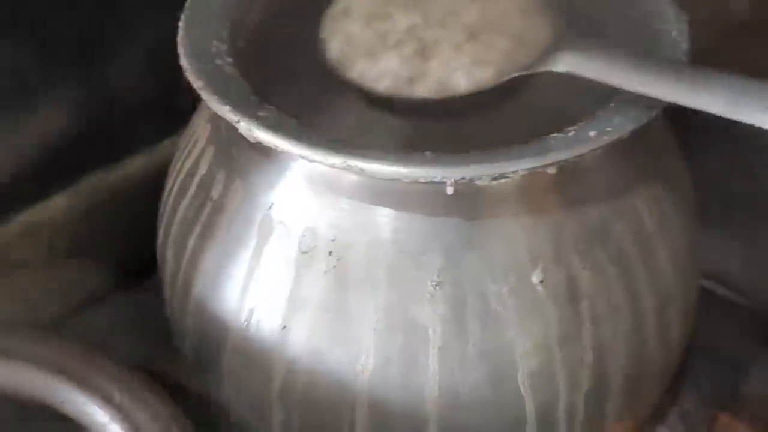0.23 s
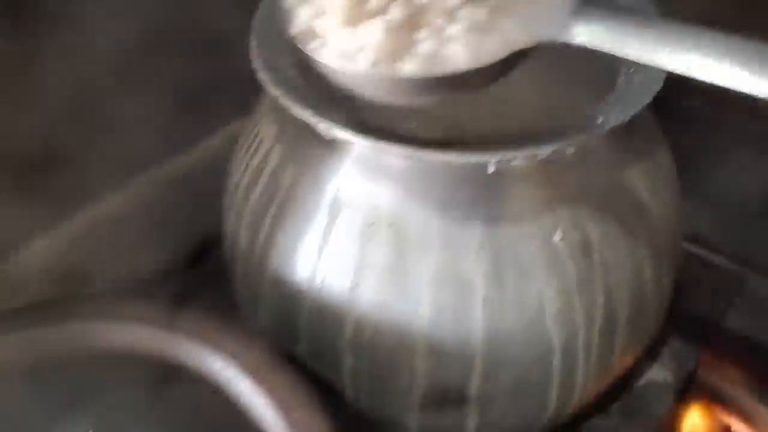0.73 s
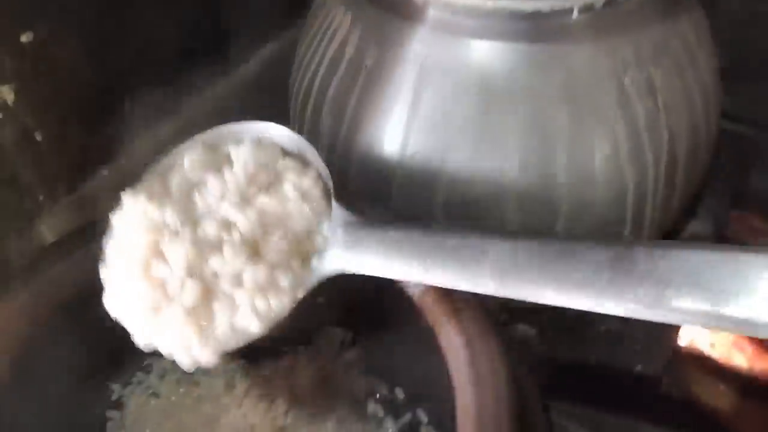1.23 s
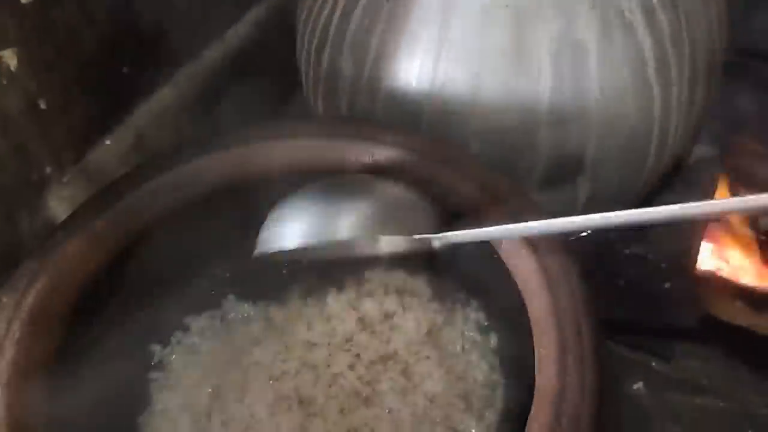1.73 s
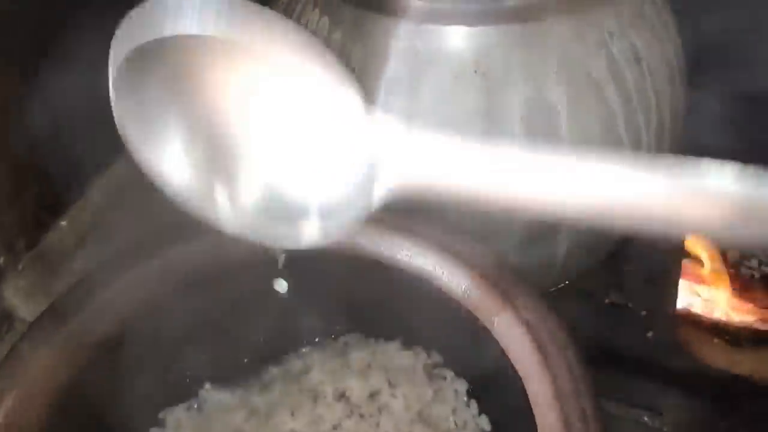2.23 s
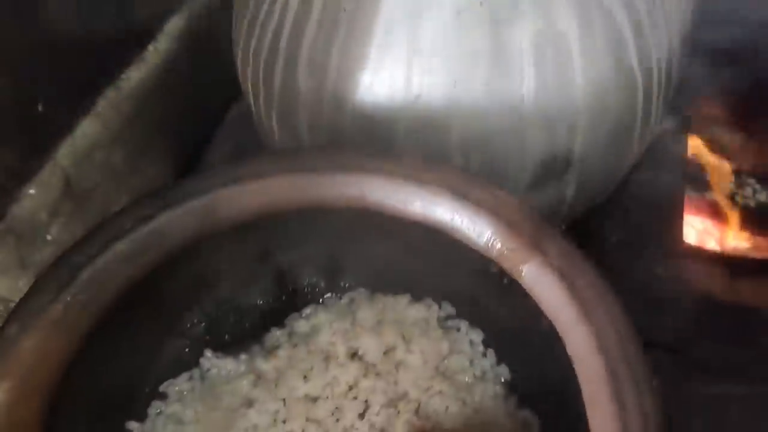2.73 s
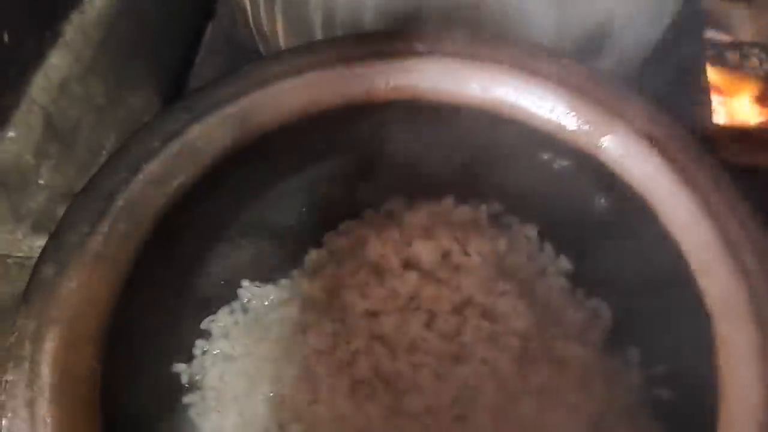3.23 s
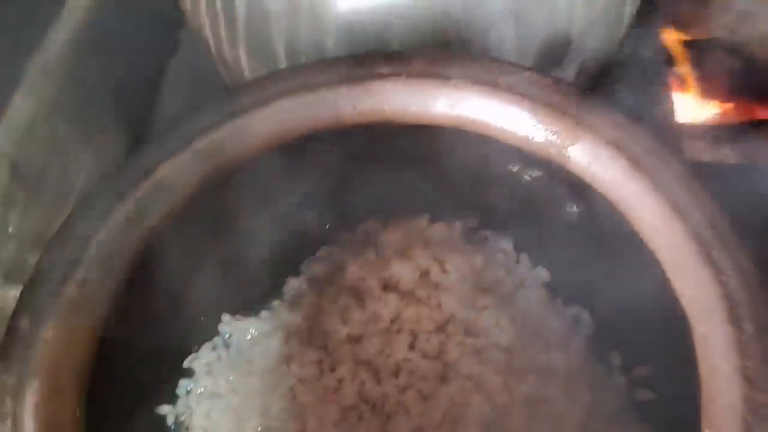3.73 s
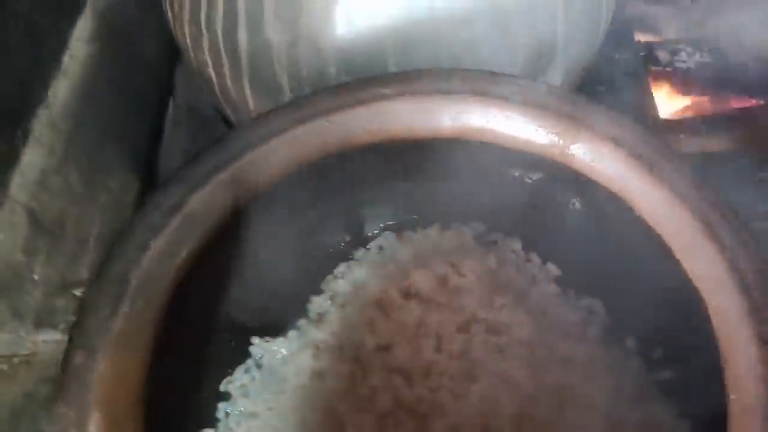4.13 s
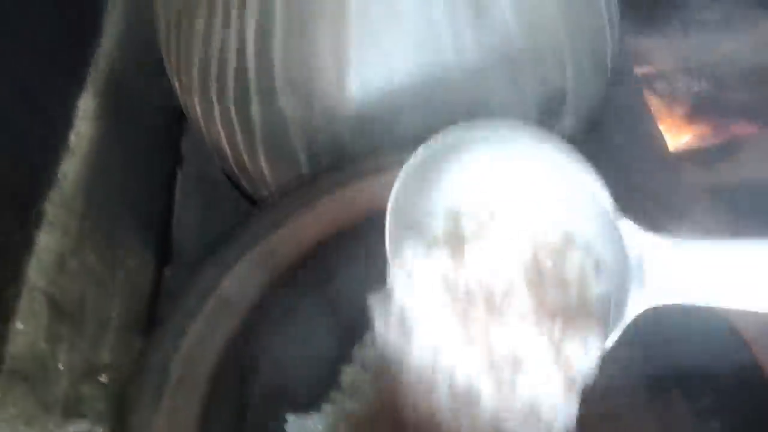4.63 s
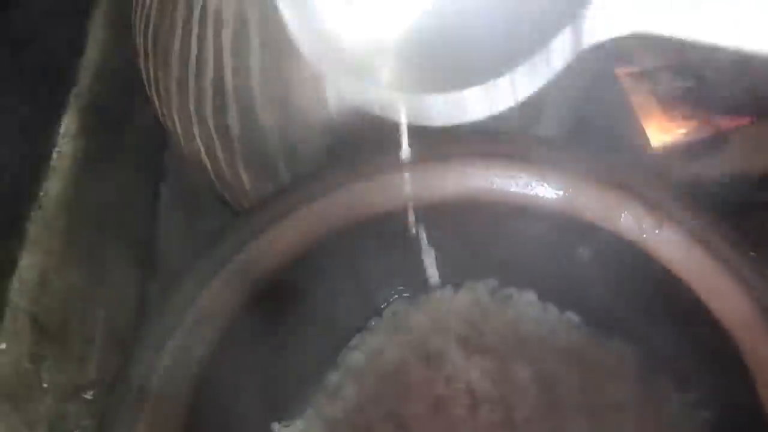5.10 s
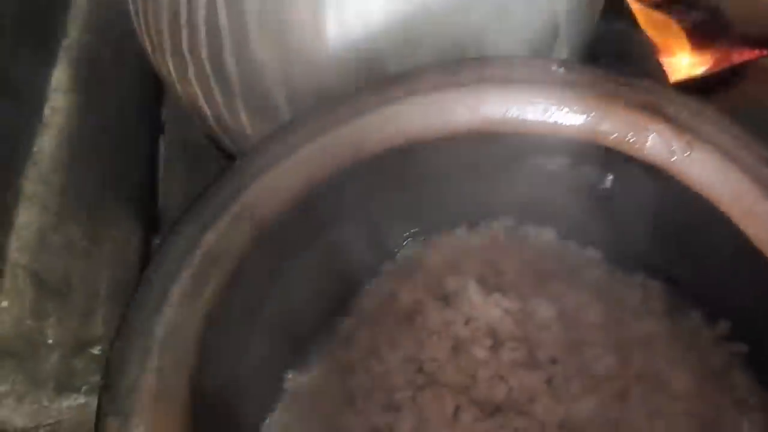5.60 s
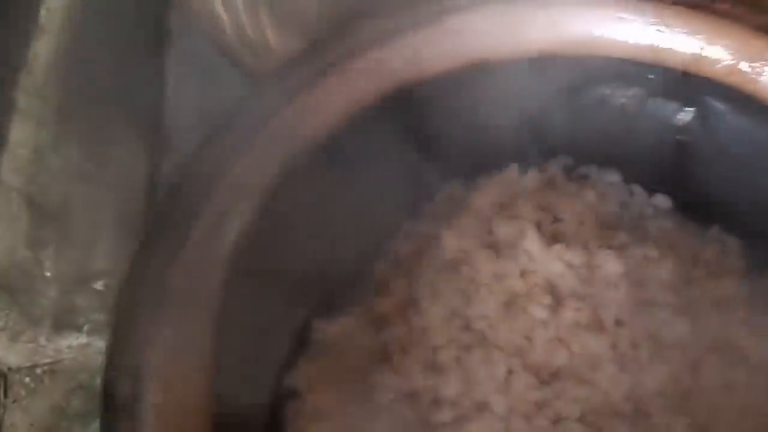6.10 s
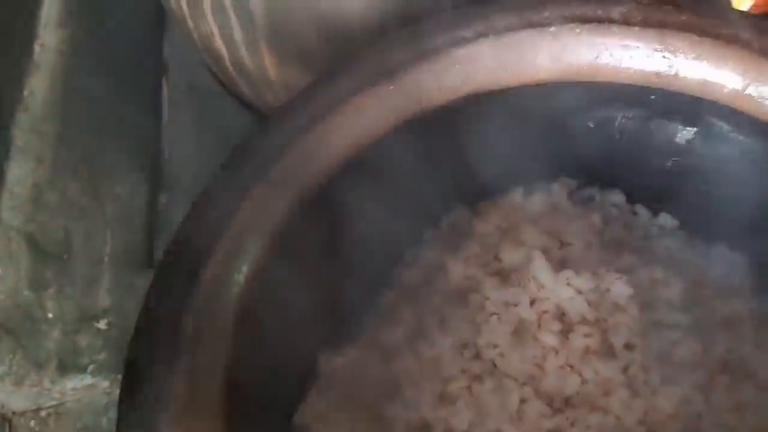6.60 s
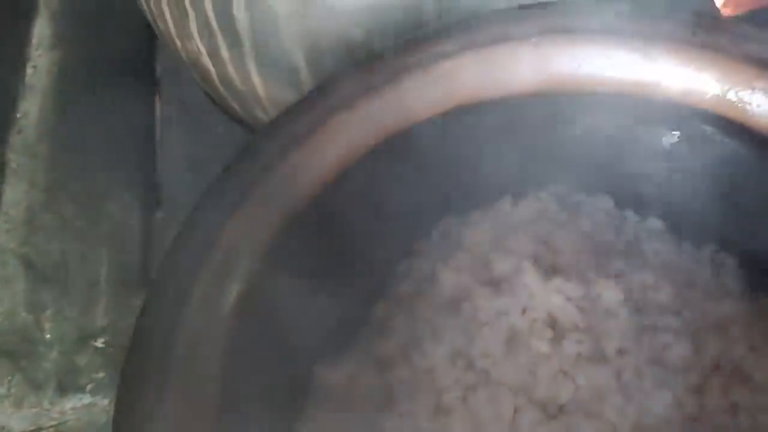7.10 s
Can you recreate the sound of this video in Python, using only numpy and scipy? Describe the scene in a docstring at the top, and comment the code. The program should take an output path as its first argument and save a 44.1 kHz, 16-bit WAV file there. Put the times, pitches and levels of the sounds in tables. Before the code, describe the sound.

A steel ladle tips soggy rice into a clay pot, close to the microphone in a small room. Wet patter and snaps lead to a sharp clack on the rim, then soft pot bubbling and gritty little scrapes. Another splashy dollop lands, with deep glugs and a thin sizzle. Late on come a dull ringing bump and rasping clinks, then quiet bubbling; a hoarse call is barely heard far outside.

```python
"""Boiled rice is ladled from an aluminium pot into a clay pot on a wood stove, close by in a small kitchen.
Wet rice slides and patters as random grains of noise and tiny ringing bubbles; water bubbles as damped tones
in the hollow of the pot. The steel ladle knocks on the clay rim, then bumps and scrapes in the metal pot:
damped modes set off by bursts of noise and by random slips. Spilt water sizzles faintly as filtered grains,
and a hoarse call far outside is narrow-band noise."""
import sys
import numpy as np
from scipy import signal
from scipy.fft import rfft, irfft, next_fast_len
from scipy.io import wavfile
from scipy.ndimage import map_coordinates

SR = 44100
rng = np.random.default_rng(int(sys.argv[2]) if len(sys.argv) > 2 else 0)


def waveform_to_disk(signal):
    """Save audio, clipped to [-1, 1], as 16-bit WAV at the path in sys.argv[1]."""
    frames = np.transpose(np.atleast_2d(signal))
    scaled = np.clip(frames, -1, 1) * 32767
    samples = np.round(scaled).astype(np.int16)
    wavfile.write(sys.argv[1], SR, samples)


N = 324135

# Levels in the tables are relative within a layer; each layer's function adds its own gain.
# wet rice slides and drips: start_s, rise_s, fade_s, crackle_db, lumps_db
RICE_SLIDES = [(0.0, 0.0008, 0.078, -64, -57), (0.208, 0.015, 0.82, -67.5, -79),
               (0.908, 0.15, 0.34, -62.5, -64.5), (1.16, 0.36, 0.13, -53, -53),
               (2.354, 0.025, 0.23, -71.5, -70), (2.579, 0.069, 0.25, -71.5, -82),
               (2.737, 0.029, 0.64, -93, -68), (2.9, 0.18, 0.19, -78, -64.5),
               (3.66, 0.17, 0.46, -55.5, -53.5), (4.252, 0.012, 0.58, -59.5, -75),
               (4.398, 0.043, 0.53, -53.5, -55), (4.519, 0.017, 0.48, -61, -66),
               (5.718, 0.024, 0.6, -94, -60), (5.843, 0.013, 0.18, -60, -59), (6.6, 0.21, 0.24, -58, -59),
               (7.012, 0.0099, 0.099, -66.5, -100)]
# spectrum of the snapping water films: frequency_hz, density_db_per_hz
CRACKLE_SPECTRUM = [(2350, -41.5), (4000, -3.5), (5020, -5), (5440, -2), (5870, -6), (7530, 4),
                    (10400, -10), (13000, -5.5), (14900, -16), (16000, -22.5)]
# spectrum of the heavier lumps: frequency_hz, density_db_per_hz
LUMP_SPECTRUM = [(350, -23), (600, 4), (845, -8.5), (1020, 0.5), (1130, -7), (1330, -16.5), (1540, -21.5),
                 (2020, -7.5), (5500, -13), (7150, -14.5), (12100, -120)]
# a slide gathers from this far under its peak, and thins out by this much over its fade
GATHER_DB, THIN_DB = 13, 32
SOFT_START_S = 0.011  # longest fade-in from silence
# air pockets pop in the wet rice, level against its lumps; cycles count to a 60 dB decay
POPS_PER_S, POP_DB, POP_HZ, POP_SCATTER, POP_CYCLES = 240, -10, 2123, 0.4, 19
# tiny bubbles ping in the water film, level against the crackle
PINGS_PER_S, PING_DB, PING_HZ, PING_SCATTER, PING_CYCLES = 420, -4, 8310, 0.14, 76
# wet smacks of rice and water: start_s, level_db, dull_db, spray_db, left_minus_right_db
WET_SMACKS = [(0.379, -41, -1, 5.5, 11), (0.486, -41.5, 0, -2.5, 8), (0.645, -48, -25, -1, 6),
              (0.932, -43, 0, -2, -4.5), (1.0517, -29, -12, -6.5, -1.5), (1.093, -36.5, -14, -2.5, 1),
              (1.272, -30, -6, -5.5, -2), (1.3697, -31.5, -6, -5.5, -2.5), (1.4203, -32, -2.5, 4, -5.5),
              (1.4604, -23.5, 3.5, -14.5, -1.5), (2.3815, -42, -18, -1.5, 7), (3.7595, -31, -10, -19, 0),
              (3.99, -32, -4, 1, -2), (4.261, -34, -11, -7, 2), (4.2864, -35.5, -4, -2, 3),
              (4.41, -30, -1.5, 2, 0), (4.443, -34, -5, 2, 0), (4.4658, -26, -8, 5.5, -0.5),
              (4.5012, -31.5, 8, 9, -1.5), (4.5356, -33.5, 1, -20, 6), (4.5679, -33, 6, -4.5, -4),
              (4.606, -31, 11, -1.5, -0.5), (4.6359, -32.5, 7, -4, -4), (5.857, -43.5, -6, 10, 5),
              (7.029, -41.5, -34, -24, -13)]
SMACK_T60_S, SMACK_ATTACK_S = 0.012, 0.002  # the film snaps and is gone

# how hard the water simmers: time_s, level_db
SIMMER_LEVEL = [(0, -63.5), (0.649, -71), (1.05, -65), (1.55, -67), (1.87, -67), (2.05, -67), (2.5, -67.5),
                (2.899, -59.5), (3.6, -59.5), (4.13, -64), (4.8, -60), (5.2, -58.5), (5.38, -61),
                (6.0, -58.5), (6.749, -53.5), (7.05, -66.5), (7.35, -55)]
# big bubbles that sound the pot's hollow: start_s, level_db, pitch_hz
BIG_BUBBLES = [(1.041, -45, 436), (1.461, -40, 458), (2.04, -54, 440), (2.363, -41.5, 453),
               (2.385, -47.5, 448), (2.711, -46, 446), (2.876, -43.5, 453), (3.266, -39.5, 439),
               (3.485, -33.5, 436), (3.761, -32, 405), (4.185, -47, 428), (4.227, -42, 450),
               (4.29, -42.5, 450), (4.472, -27, 436), (4.931, -34.5, 468), (5.076, -26.5, 453),
               (5.252, -37.5, 462), (5.58, -35.5, 404), (5.704, -27, 419), (5.847, -30.5, 420),
               (6.618, -40, 430), (6.779, -34.5, 382), (7.028, -42.5, 420), (7.226, -42, 420),
               (7.311, -37, 385)]
# resonance of the pot's hollow: frequency_hz, density_db_per_hz
HOLLOW_SPECTRUM = [(50, -43.5), (110, -27), (170, -18), (270, -11.5), (330, -9), (395, 0), (450, 7),
                   (540, -16), (700, -30.5), (820, -12.5), (940, -44), (1090, -14), (1300, -42),
                   (2200, -57)]
# small bubbles come at random, their level following the simmer
BLIPS_PER_S, BLIP_DB, BLIP_SCATTER_DB, BLIP_HZ, BLIP_SCATTER = 7, 6.5, 6, 444, 0.047
# drops that fall into water; the first row, at 0.107 s, is instead the low tone of the ladle's light tap on the
# pot: start_s, level_db, pitch_hz, spatter_db
WATER_DROPS = [(0.107, -47.5, 1100, -7), (1.986, -51, 1100, -32), (2.166, -55, 1110, -26),
               (2.771, -40, 1033, -7.5), (3.692, -42, 970, -7), (3.724, -41, 904, -6),
               (3.759, -34, 996, -2), (3.793, -38.5, 1073, -18), (4.42, -49, 1970, 1.5),
               (4.471, -52, 1150, -8), (4.508, -47, 1150, 0), (4.556, -43, 2030, -18),
               (4.878, -40, 1077, -11.5), (5.733, -37, 1088, -1), (5.765, -41, 1032, 2),
               (6.692, -46.5, 1050, 4), (6.784, -42.5, 1040, -19)]
# water runs off the ladle into the clay pot: start_s, rise_s, fade_s, level_db
LADLE_TRICKLES = [(1.04, 0.01, 0.25, -60.5), (1.2, 0.27, 0.35, -61)]
PLOPS_PER_S, PLOP_HZ, PLOP_SCATTER, PLOP_CYCLES = 90, 700, 0.38, 54

# the ladle strikes the clay pot's rim: start_s, level_db
RIM_KNOCKS = [(1.628, -41.5), (1.6288, -14.5)]
# modes of the ladle against a rim: frequency_hz, level_db, t60_s
RIM_MODES = [(126, -29.5, 0.097), (244.6, -17.5, 0.099), (341, -18, 0.15), (449, -11, 0.17),
             (505, -13.5, 0.1), (697, -23.5, 0.16), (937, -11, 0.04), (1076, -5.5, 0.04),
             (1236, -30.5, 0.31), (1430, -1.5, 0.017), (1747, 0.5, 0.015), (1955, 3, 0.016),
             (2190, -3.5, 0.02), (2120, -31.5, 0.25), (3940, -34, 0.3), (13200, -22, 0.13),
             (14300, -36, 0.1)]
# spectrum of the dry clack: frequency_hz, density_db_per_hz
CRACK_SPECTRUM = [(30, -36.5), (60, -26), (95, -12), (150, -10), (240, -7), (470, 0.5), (720, -8), (950, 3),
                  (1450, -1.5), (2000, -9), (2400, -13.5), (3000, -18), (3600, -21.5), (4300, -18.5),
                  (5300, -29.5), (8000, -21), (11000, -37.5), (13200, -32), (16000, -38)]
ECHO_S, ECHO_DB = 0.03, -16.5  # a kitchen wall throws back the middle of the ladle's ring

# the ladle meets the metal pot:
# start_s, click_db, wall_db, hollow_db, hollow_rise_s, hollow_pitch_hz, hollow_t60_s
POT_BUMPS = [(0.048, -61, -66, -56, 0.004, 490, 0.037), (0.226, -82, -48.5, -48, 0.0036, 480, 0.061),
             (0.267, -61, -47.5, -52, 0.0026, 460, 0.069), (1.936, -70, -51.5, -82, 0.003, 430, 0.08),
             (3.124, -33, -45, -54, 0.0037, 460, 0.1), (3.315, -44.5, -50, -52, 0.002, 440, 0.1),
             (6.098, -31, -22.5, -20, 0.01, 439.4, 0.089), (6.151, -41.5, -30, -30.5, 0.062, 459, 0.12),
             (6.2464, -27.5, -33.5, -37, 0.0082, 455, 0.2)]
# modes of the metal pot with its load: frequency_hz, level_db, t60_s
WALL_MODES = [(97, -32, 0.095), (191, -6, 0.22), (216, -5, 0.12), (269.8, 2.5, 0.12), (319, -2.5, 0.041),
              (386.7, 0.5, 0.09), (476, -1, 0.098), (635, -9, 0.069), (682, -7, 0.042),
              (739.6, -3.5, 0.062), (1360, -11.5, 0.036)]
WALL_BUILD_CYCLES, THUD_DB = 3.1, -12.5  # low modes are the slowest to swell; dull thud of the load
# strokes of the ladle in the metal pot: start_s, length_s, end_grit_db, grit_growth_db, wall_db
LADLE_STROKES = [(3.113, 0.12, -58.5, 3, -60), (3.299, 0.072, -56, 9, -53.5),
                 (3.416, 0.057, -51.5, 1, -54.5), (3.517, 0.037, -47, -8, -67),
                 (3.585, 0.018, -48.5, 0, -53), (6.228, 0.155, -43.5, 10, -40),
                 (6.419, 0.022, -44.5, -3, -43.5), (6.529, 0.031, -52.5, -6.5, -61)]
STROKE_ATTACK_S, STROKE_RELEASE_S = 0.037, 0.27  # the edge bites; it lets go (60 dB)
# spectrum of gritty contact: frequency_hz, density_db_per_hz
GRIT_SPECTRUM = [(60, -81), (300, -20), (800, -8.5), (1100, -2.5), (1350, -7), (1900, 0), (2400, 0),
                 (3050, -7), (3600, -5), (5000, -5.5), (8100, -5), (10400, -15.5), (14000, -19.5),
                 (16000, -31)]
# modes of the ladle's bowl, rung by every slip of its edge: frequency_hz, level_db, t60_s
BOWL_MODES = [(736, 11, 0.059), (1337, 5, 0.09), (1840, 11, 0.013), (2340, 7, 0.044), (3500, -10.5, 0.073),
              (3900, 13, 0.049), (8340, 7, 0.016)]
BOWL_DB = -7  # over the dry rasp
# the ladle's edge catches and sings: start_s, length_s, pitch_hz, level_db
EDGE_CHATTER = [(3.306, 0.14, 4060, -59.5), (3.443, 0.097, 2380, -53), (6.328, 0.059, 2450, -48),
                (6.533, 0.049, 1680, -54)]
CHATTER_WANDER = 0.038  # share by which the pitch shifts as the contact point moves
# the edge taps the pot or snags on a crust: start_s, ring_db, pitch_hz, t60_s, crunch_db, wall_db
EDGE_CLINKS = [(0.107, -54.5, 2062, 0.15, -53.5, -52), (2.383, -54.5, 970, 0.023, -67, -51.5),
               (2.833, -58, 1700, 0.018, -67, -80), (2.932, -51, 1770, 0.019, -72, -80),
               (3.0285, -49, 2940, 0.014, -42.5, -70), (3.126, -38.5, 743, 0.088, -48, -48),
               (3.138, -51, 1370, 0.042, -47, -42.5), (3.229, -49, 2410, 0.052, -52, -54),
               (3.443, -49, 2150, 0.063, -43, -41), (3.46, -40.5, 2295, 0.076, -52.5, -58),
               (3.482, -40, 764, 0.054, -67, -46), (3.541, -48, 2390, 0.04, -37, -50),
               (3.627, -42.5, 1220, 0.024, -32, -61), (3.652, -57, 2130, 0.03, -35, -45),
               (6.262, -40, 2490, 0.044, -40, -29), (6.303, -47.5, 1435, 0.035, -34, -30),
               (6.33, -37.5, 2470, 0.055, -43, -32), (6.346, -31.5, 746, 0.094, -39, -26.5),
               (6.366, -44, 1326, 0.08, -40, -28), (6.385, -50, 2060, 0.038, -46, -27.5),
               (6.422, -44, 1346, 0.069, -40, -35), (6.468, -47, 1730, 0.074, -27.5, -44),
               (6.534, -47, 1690, 0.05, -52, -54), (6.561, -56, 1710, 0.044, -44, -54),
               (6.59, -58, 1490, 0.037, -39, -70)]

# soft shuffling of the hand and handle: start_s, rise_s, fade_s, level_db
HANDLE_SHUFFLE = [(0.0, 0.043, 0.44, -56.5), (0.211, 0.013, 0.83, -58), (5.0, 0.115, 0.4, -61.5),
                  (5.62, 0.11, 0.35, -60), (7.22, 0.028, 0.077, -83)]
# spectrum of dull rubs and thuds: frequency_hz, density_db_per_hz
DULL_SPECTRUM = [(40, -28), (95, -1.5), (190, 6), (270, 2), (340, -7.5), (560, 4), (800, -4), (1200, -12),
                 (1600, -45.5), (2200, -21), (5000, -34)]
# spilt water sizzles on the hot stove and boils away
SPILL_S, SPILL_RISE_S, SPILL_DB, BOIL_OFF_DB_PER_S = 4.314, 0.21, -55.5, 9.5
EMBER_HISS_DB, QUIET_DB = -103, -78
# spectrum of the sizzle: frequency_hz, density_db_per_hz
STEAM_SPECTRUM = [(1000, -11.5), (2000, -27), (2800, -5), (3500, -17), (5000, -7.5), (7600, 2.5),
                  (9500, -6), (13000, -1), (16000, -19.5)]
# spectrum of the quiet kitchen: frequency_hz, density_db_per_hz
QUIET_SPECTRUM = [(25, -20.5), (100, -21.5), (440, -3), (700, -15.5), (1100, -11), (1600, -24),
                  (3300, -30.5), (7000, -21.5), (13000, -34), (16000, -41.5)]
# a hoarse call far outside, perhaps a crow: start_s, length_s, level_db
FAR_CALLS = [(0.243, 0.35, -63.5), (2.846, 0.29, -60), (4.17, 0.3, -62), (7.105, 0.29, -69)]
# what reaches the kitchen of it: frequency_hz, density_db_per_hz
HOARSE_SPECTRUM = [(850, -46), (1050, -0.5), (1170, 4), (1280, 2.5), (1400, -27), (1600, -37), (6000, -68)]

# decay of the kitchen's tail: frequency_hz, t60_s
KITCHEN_DECAY = [(150, 0.53), (500, 0.38), (2000, 0.38), (8000, 0.46), (15000, 0.61)]
# left-right likeness of diffuse sound: frequency_hz, correlation (1 is alike)
LIKENESS = [(200, 0.89), (450, 0.35), (900, 0.057), (2000, 0.014), (10000, 0.0199)]
# how the two microphones differ: frequency_hz, left_minus_right_db
CHANNEL_TILT = [(120, -3), (230, -4), (420, 0), (800, -1.5), (2000, 1), (4400, 1.5), (8000, 1.5),
                (11000, 3), (15000, 13)]
TOP_HZ = 15700  # band limit


def rice():
    """Granular noise: water films snap and ping between grains; heavier lumps land with a lower smack."""
    crackle, lumps = np.zeros(N), np.zeros(N)
    for s, rise, fade, crackle_db, lumps_db in RICE_SLIDES:
        movement = swell(s, rise, fade)
        crackle += amp(crackle_db) * movement
        lumps += amp(lumps_db) * movement
    clumps = amp(2.6 * wobble(45))
    films = colour(grains(rate=1030, spread_db=4.0, channels=2), CRACKLE_SPECTRUM)
    fine = amp(1.0) * unit(clumps * films)
    pings = amp(PING_DB) * pops(PINGS_PER_S, PING_HZ, PING_SCATTER, PING_CYCLES, spread_db=8)
    landings = colour(grains(rate=570, spread_db=2.5, channels=2), LUMP_SPECTRUM)
    coarse = amp(-2.5) * unit(clumps * landings)
    pockets = amp(POP_DB) * pops(POPS_PER_S, POP_HZ, POP_SCATTER, POP_CYCLES, spread_db=2.5)
    slide = crackle * (fine + pings) + lumps * (coarse + pockets)
    return kitchen(slide, near_db=0.5, room_db=-11.5)


def smacks():
    """Transient film rupture: each wet snap is a short burst with its own dull smack and high spray."""
    out = np.zeros((2, N))
    for s, db, low_db, spray_db, pan_db in WET_SMACKS:
        snap = np.array([burst(SMACK_T60_S, SMACK_ATTACK_S) for _ in range(2)])[:, :SR // 20]
        low = amp(low_db) * unit(band(snap, 2100, 3900))
        core = amp(8.5) * unit(band(snap, 6580, 8630))
        spray = amp(spray_db + 6.0) * unit(band(snap, 10000, 14150))
        smack = crest(low + core + spray)
        add(out, s, amp(db - 2.5) * kitchen(smack, near_db=-5, room_db=-7.5, pan_db=pan_db))
    return out


def simmer():
    """Cavity resonance: bubbles burst in clusters and sound the pot's hollow; a few big ones stand out."""
    level = amp(np.interp(np.arange(N) / SR, *np.transpose(SIMMER_LEVEL)))
    bubbles = grains(rate=880, spread_db=-1.5, channels=2) * amp(3.7 * wobble(18))
    murmur = unit(widen(colour(bubbles, HOLLOW_SPECTRUM))) * amp(5)
    blips = np.zeros(N)
    for k, (late, size, pitch) in enumerate(rng.standard_normal((64, 3))):
        s = (k + 0.36 * late) / BLIPS_PER_S
        if s < N / SR - .01:
            blip = glug(BLIP_HZ * np.exp(BLIP_SCATTER * pitch))
            add(blips, s, amp(BLIP_DB + BLIP_SCATTER_DB * size) * blip)
    out = level * (murmur + amp(-10.5) * kitchen(blips, near_db=1.5, room_db=-11.0))
    for s, db, hz in BIG_BUBBLES:
        add(out, s, amp(db - 9.0) * kitchen(glug(hz), near_db=13, room_db=1.5))
    return out


def glug(hz):
    """Modal decay: one bubble sounds the pot's hollow as three damped tones, at peak 1."""
    modes = [(hz, 0, .038), (hz * .6, -13, .05), (hz * 1.2, -16, .02)]
    return crest(ring(modes, attack=0.0043, scatter_db=2.5))


def drops():
    """Bubble resonance: each drop spatters and traps a bubble that rings as a short damped tone."""
    out = np.zeros((2, N))
    for s, db, hz, spatter_db in WATER_DROPS:
        plip = crest(ring([(hz, 0, .022)], attack=0.014))
        spatter = amp(spatter_db) * crest(band(burst(t60=0.023, attack=0.00015), 1200, 2390))
        add(out, s, amp(db - 7.5) * kitchen(plip + spatter, near_db=1.5, room_db=0))
    return out


def trickle():
    """Bubble resonance in numbers: water from the ladle traps a run of low bubbles where it lands."""
    flow = sum(amp(db) * swell(s, rise, fade) for s, rise, fade, db in LADLE_TRICKLES)
    plops = pops(PLOPS_PER_S, PLOP_HZ, PLOP_SCATTER, PLOP_CYCLES, spread_db=7)
    return kitchen(flow * plops, near_db=-2, room_db=-6)


def knock():
    """Impact on damped modes: steel on clay gives a dry clack, a thin ring and a reflection off a wall."""
    out = np.zeros((2, N))
    for s, db in RIM_KNOCKS:
        modes = crest(ring(RIM_MODES, attack=0.0001, scatter_db=2.5, build_cycles=1.0))
        crack = crest(colour(burst(t60=0.0091, attack=0.00018), CRACK_SPECTRUM))
        ladle = kitchen(modes, near_db=-6, room_db=-15, pan_db=-1, near_t60=0.015, near_hz=299)
        clack = kitchen(crack, near_db=3.5, room_db=2.5, near_t60=0.017)
        echo = kitchen(band(modes, 600, 2200), near_db=-9.5, room_db=-3.5, near_t60=0.019)
        add(out, s, amp(db - 1.0) * ladle)
        add(out, s, amp(db - 3.5) * clack)
        add(out, s + ECHO_S, amp(db + ECHO_DB) * echo)
    return out


def bumps():
    """Coupled resonators: the ladle clicks on the wall, which thuds and rings, and pushes the pot's air."""
    out = np.zeros((2, N))
    for s, click_db, wall_db, hollow_db, rise, hz, t60 in POT_BUMPS:
        click = amp(click_db) * crest(colour(burst(t60=0.023, attack=0.0032), GRIT_SPECTRUM))
        wall = crest(ring(WALL_MODES, attack=0.00062, scatter_db=2.5, build_cycles=WALL_BUILD_CYCLES))
        thud = amp(THUD_DB) * crest(colour(burst(t60=0.13, attack=0.0029), DULL_SPECTRUM))
        hollow = amp(hollow_db) * crest(ring([(hz, 0, t60)], attack=rise))
        add(out, s, kitchen(click, near_db=1, room_db=1.5))
        add(out, s, kitchen(amp(wall_db) * (wall + thud) + hollow, near_db=-6, room_db=-17))
    return out


def scrapes():
    """Stick-slip friction: the edge catches on crusted grains; slips rasp, heavier ones shake the wall."""
    grit = sum(amp(db) * stroke(s, length, growth_db) for s, length, db, growth_db, _ in LADLE_STROKES)
    wall = sum(amp(db) * stroke(s, length) for s, length, _, _, db in LADLE_STROKES)
    grip = amp(3 * wobble(55))
    slips = grip * grains(rate=380, spread_db=-2.0)
    dry_slips = unit(colour(slips, GRIT_SPECTRUM))
    rasp = amp(-1.5) * grit * (dry_slips + amp(BOWL_DB) * unit(bowl_ring(slips[0])))
    jolts = grip * grains(rate=330, spread_db=-1.5)[0]
    modes = ring(WALL_MODES, attack=0.0011, scatter_db=7.5)
    thud = colour(burst(t60=0.024), DULL_SPECTRUM)
    shake = unit(modes) + amp(-7.5) * unit(thud)
    body = wall * unit(band(signal.fftconvolve(jolts, shake)[:N], 54, 2500))
    edge = kitchen(rasp + amp(-6.0) * grip * edge_song(), near_db=8.0, room_db=8)
    return amp(-6.5) * edge + amp(-5.0) * kitchen(body, near_db=7.5, room_db=1.5)


def bowl_ring(slips):
    """Modal excitation by convolution: slips ring the bowl at pitches shifted with the contact point."""
    bowl = np.zeros(N)
    for shift in (0.98, 1, 1.02):
        modes = ring([(hz * shift, db, t60) for hz, db, t60 in BOWL_MODES], attack=.0002, scatter_db=2)
        share = amp(6 * np.clip(wobble(28), -2, 1))
        bowl += signal.fftconvolve(slips * share, modes)[:N]
    return bowl


def edge_song():
    """Frictional tone: the caught edge sings at a wandering pitch with a fast random flutter."""
    song = np.zeros(N)
    for s, length, hz, db in EDGE_CHATTER:
        catch = signal.windows.tukey(round(length * SR), .6)
        pitch = hz * (1 + CHATTER_WANDER * wobble(59.7)[:len(catch)])
        flutter = unit(band(rng.standard_normal(len(catch)), 15, 100))
        tone = np.sin(2 * np.pi * np.cumsum(pitch) / SR)
        add(song, s, amp(db) * catch * unit(flutter * tone))
    return song


def clinks():
    """Point excitation: each contact rings at its own pitch, set by where the edge touches, and jolts the wall."""
    out = np.zeros((2, N))
    for s, db, hz, t60, crunch_db, wall_db in EDGE_CLINKS:
        modes = [(hz, 0, t60), (hz * 0.96, -7, t60), (hz * 1.83, -11, t60 / 2)]
        clink = amp(db) * crest(ring(modes, attack=0.0008, scatter_db=1.5))
        crunch = amp(crunch_db) * crest(colour(burst(t60=0.014, attack=0.00041), GRIT_SPECTRUM))
        damping = amp(-130 * np.arange(SR // 2) / SR)  # the ladle damps the wall, dB per second
        wall = crest(ring(WALL_MODES, attack=0.0014, scatter_db=-1.0) * damping)
        add(out, s, amp(-4.5) * kitchen(clink + crunch, near_db=1.5, room_db=-1))
        add(out, s, amp(wall_db - 2) * kitchen(wall, near_db=-4, room_db=-10))
    return out


def stroke(s, length, growth_db=0):
    """Friction envelope: the edge bites, presses harder if growth_db is positive, and lets go."""
    t = np.arange(N) / SR - s
    growth = -growth_db * np.clip(1 - t / length, 0, 1)
    release = -60 * np.maximum(t - length, 0) / STROKE_RELEASE_S
    return np.clip(t / STROKE_ATTACK_S, 0, 1) * amp(growth + release)


def shuffle():
    """Soft friction noise: dull, uneven rubbing as the full ladle is handled."""
    level = sum(amp(db) * swell(s, rise, fade) for s, rise, fade, db in HANDLE_SHUFFLE)
    rub = unit(colour(grains(rate=240, spread_db=0.0), DULL_SPECTRUM))
    return amp(-1.5) * kitchen(level * rub, near_db=1.5, room_db=0.0)


def hiss():
    """Dense impulse noise: a fine sizzle flares up with the spill and dies slowly over the quiet kitchen."""
    t = np.arange(N) / SR - SPILL_S
    boil_off = amp(SPILL_DB - BOIL_OFF_DB_PER_S * np.maximum(t, 0))
    spill = np.clip(t / SPILL_RISE_S, 0, 1) * boil_off
    steam = unit(colour(grains(rate=5200, spread_db=1.0, channels=2), STEAM_SPECTRUM))
    quiet = unit(widen(colour(rng.standard_normal((2, N)), QUIET_SPECTRUM)))
    return (spill + amp(EMBER_HISS_DB)) * steam + amp(QUIET_DB) * quiet


def far_calls():
    """Band-limited noise: a faint, hoarse call comes in from far away, smeared to a narrow band."""
    out = np.zeros((2, N))
    for s, length, db in FAR_CALLS:
        shape = signal.windows.tukey(round(length * SR), .55)
        voice = unit(colour(rng.standard_normal((2, len(shape))), HOARSE_SPECTRUM))
        add(out, s, amp(db - 1.0) * shape * voice)
    return out


def kitchen(x, near_db, room_db, pan_db=0, near_t60=0.091, near_hz=700):
    """Room response: direct sound, quick echoes from the pots and stove, and a decaying diffuse tail."""
    hz, t, z = signal.stft(rng.standard_normal((2, SR // 3)), SR, nperseg=256)
    decay = amp(-60 * t / along(KITCHEN_DECAY, hz)[:, None])
    tail = signal.istft(z * decay, SR, nperseg=256)[1]
    t = np.arange(tail.shape[1]) / SR
    tail = tail * np.minimum(t / 0.017, 1)
    # small things nearby throw back only the short waves
    near = rng.standard_normal(tail.shape) * amp(-60 * t / near_t60) * (t > .0005)
    near = band(near, near_hz, 28000)
    near = amp(near_db) * near / np.linalg.norm(near[0])
    tail = amp(room_db) * tail / np.linalg.norm(tail[0])
    echo = widen(near + tail)
    echo[:, 0] += 1  # direct sound
    pan = amp([[pan_db / 2], [-pan_db / 2]])
    return signal.fftconvolve(np.atleast_2d(x), echo, axes=1)[:, :N] * pan


def widen(pair):
    """Interaural coherence: mix two unrelated signals to left and right, alike in bass, apart in treble."""
    n = pair.shape[1]
    m = next_fast_len(n, True)
    turn = np.arccos(np.clip(along(LIKENESS, np.fft.rfftfreq(m, 1 / SR)), -1, 1)) / 2
    mid, side = irfft(rfft(pair, m) * [np.cos(turn), np.sin(turn)], m)[:, :n]
    return np.array([mid + side, mid - side])


def pops(per_s, centre_hz, scatter, cycles, spread_db):
    """Bubble resonance: bubbles of many sizes ring with a rising pitch, cut at 25 ms; rms 1."""
    count = int(per_s * N / SR)
    draws = np.clip(rng.standard_normal((8192, 3)), -2, 2)[:count]
    late, size, pitch = draws.T[:, :, None]
    start = np.abs((np.arange(count)[:, None] + late) * SR / per_s).astype(int)
    n = np.arange(SR // 40)
    turns = n / SR * centre_hz * np.exp(scatter * pitch)
    age = np.minimum(turns / cycles, 2)  # 1 when the ring is 60 dB down
    waves = amp(spread_db * size - 60 * age) * np.sin(2 * np.pi * turns * (1 + 0.04 * age))
    return unit(np.bincount((start + n).ravel(), waves.ravel(), N)[:N])


def swell(s, rise, fade):
    """Movement envelope: gain that gathers to a peak and thins out, linearly in decibels."""
    t = np.arange(N) / SR - s
    db = -GATHER_DB * np.clip(1 - t / rise, 0, 1) - THIN_DB * np.maximum(t - rise, 0) / fade
    return np.clip(t / min(rise, SOFT_START_S), 0, 1) * amp(db)


def ring(modes, attack, scatter_db=6.5, build_cycles=0):
    """Modal synthesis: damped sines of slightly random strength; each may take some cycles to build up."""
    t = np.arange(SR // 2) / SR
    out = np.zeros(len(t))
    for k, (hz, db, t60) in enumerate(modes):
        decay = amp(db + scatter_db * rng.normal() - 60 * t / t60)
        build = 1 - np.exp(-t / (attack + build_cycles / hz))
        out += (-1) ** k * decay * np.sin(2 * np.pi * hz * t) * build
    return out


def burst(t60, attack=0.000067):
    """Exponential decay: a puff of noise that dies away."""
    t = np.arange(SR // 2) / SR
    return rng.standard_normal(len(t)) * amp(-60 * t / t60) * (1 - np.exp(-t / attack))


def grains(rate, spread_db, channels=1):
    """Random impulse train: tiny impulses of uneven size, on average rate a second."""
    scatter = amp(spread_db * np.minimum(rng.standard_normal((channels, N)), 2))
    size = rng.standard_normal((channels, N)) * scatter
    return size * (rng.random((channels, N)) < rate / SR)


def wobble(rate):
    """Spline interpolation: a smooth random curve, rate knots a second."""
    knots = rng.standard_normal(4096)
    return map_coordinates(knots, [np.arange(N) * rate / SR], mode="wrap")


def colour(x, spectrum):
    """Minimum-phase filtering: a causal response with the given spectrum, from its folded cepstrum."""
    m = 4096
    cep = irfft(np.log(amp(along(spectrum, np.fft.rfftfreq(m, 1 / SR))) + 1e-6))
    cep[1:m // 2] *= 2
    cep[m // 2 + 1:] = 0
    response = irfft(np.exp(rfft(cep)))
    wet = signal.oaconvolve(np.atleast_2d(x), response[None], axes=1)
    return wet[:, :x.shape[-1]].reshape(x.shape)


def band(x, low_hz, high_hz):
    """Band-pass filtering with gentle slopes, the upper edge kept under half the sample rate."""
    edges = [low_hz, min(high_hz, SR / 2 - 500)]
    return signal.sosfilt(signal.butter(2, edges, "band", fs=SR, output="sos"), x)


def along(points, hz):
    """Logarithmic frequency: table values interpolated on a log axis."""
    f, v = np.transpose(points)
    return np.interp(np.log(hz + 1), np.log(f + 1), v)


def amp(db):
    """Decibel law: level to amplitude gain."""
    return 10 ** (np.asarray(db) / 20)


def unit(x):
    """Power normalisation: x at rms 1."""
    return x / np.sqrt(np.mean(x ** 2) + 1e-20)


def crest(x):
    """Peak normalisation: x at peak 1."""
    return x / (np.abs(x).max() + 1e-20)


def add(track, s, x):
    """Superposition: mix x into the track at s seconds."""
    start = max(round(s * SR), 0)
    track[..., start:start + x.shape[-1]] += x[..., :N - start]


def scene():
    """Superposition of everything at the stove and the call outside."""
    food = rice() + smacks() + simmer() + drops() + trickle()
    ladle = knock() + bumps() + scrapes() + clinks() + shuffle()
    return food + ladle + hiss() + far_calls()


def record(dry):
    """Channel response: the left microphone is brighter; nothing is kept above the band limit."""
    m = next_fast_len(N + SR // 4)
    hz = np.fft.rfftfreq(m, 1 / SR)
    tilt = amp(np.outer([1, -1], along(CHANNEL_TILT, hz)) / 2)
    return irfft(rfft(dry, m) * tilt * (hz < TOP_HZ), m)[:, :N]


dry = scene()
out = record(dry)
waveform_to_disk(out)
```